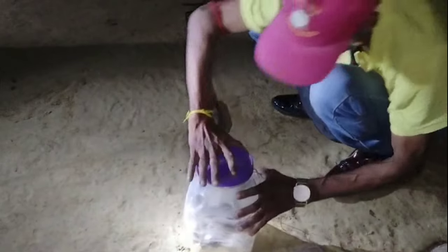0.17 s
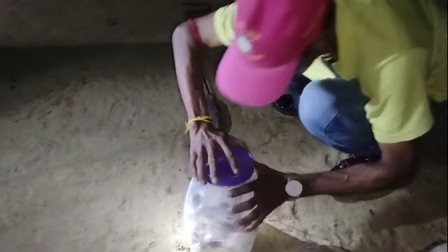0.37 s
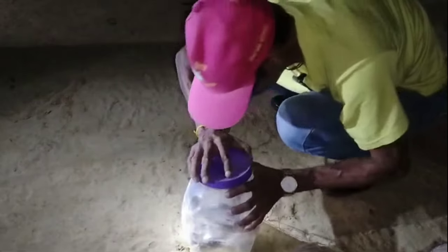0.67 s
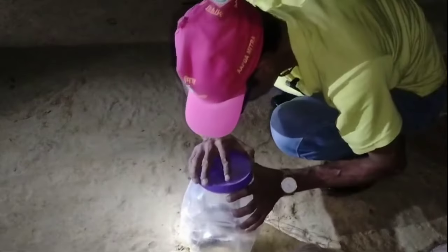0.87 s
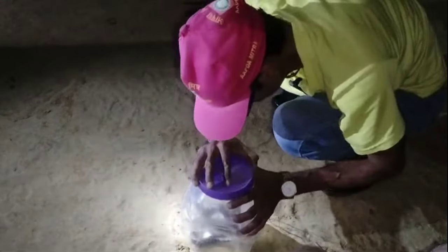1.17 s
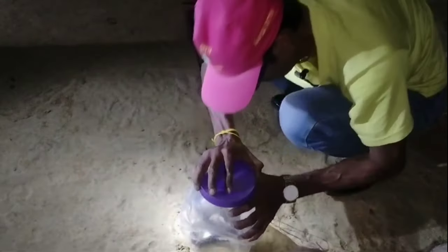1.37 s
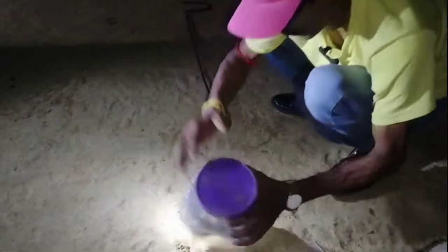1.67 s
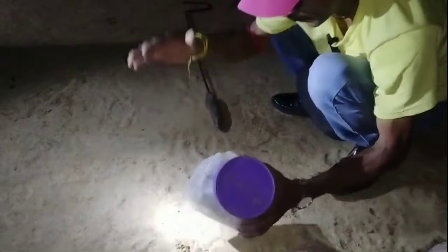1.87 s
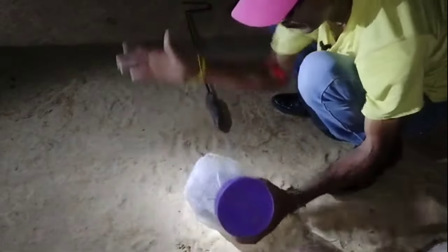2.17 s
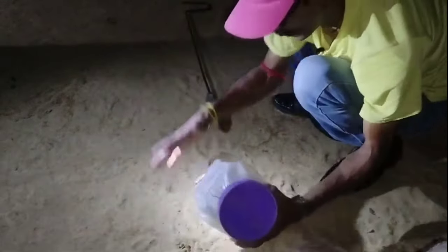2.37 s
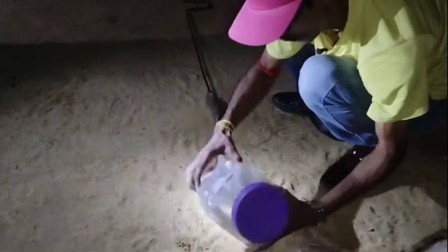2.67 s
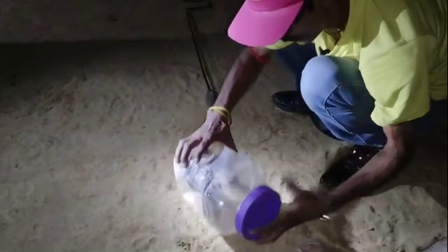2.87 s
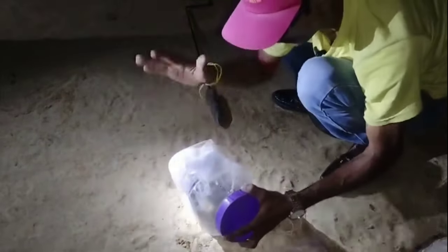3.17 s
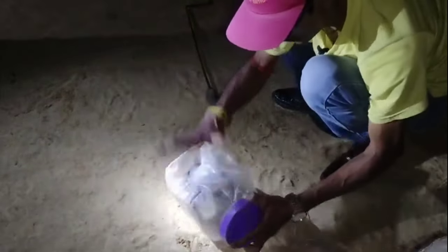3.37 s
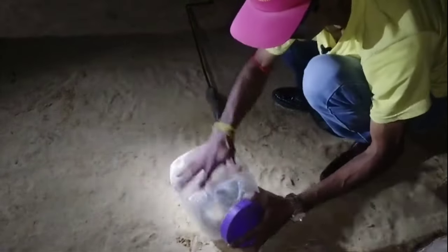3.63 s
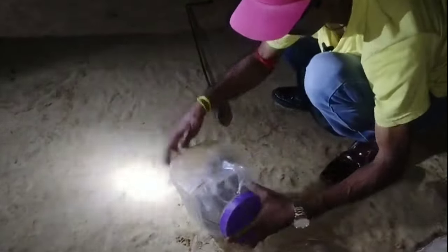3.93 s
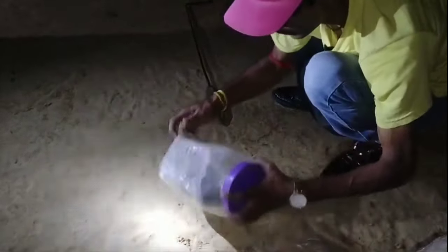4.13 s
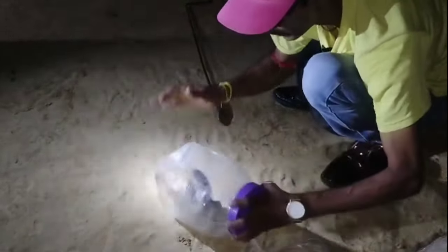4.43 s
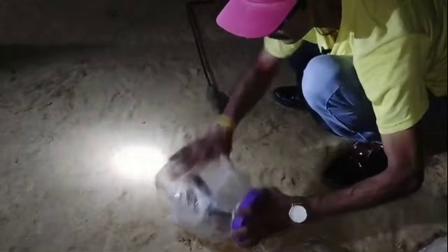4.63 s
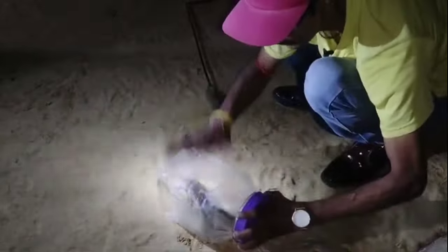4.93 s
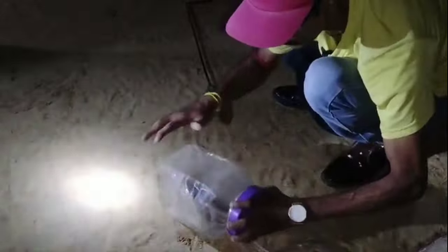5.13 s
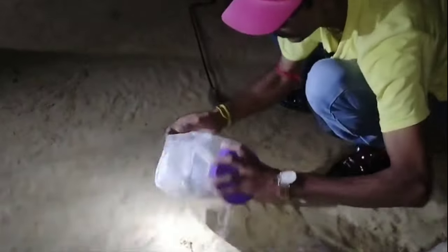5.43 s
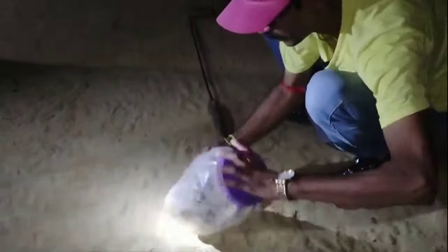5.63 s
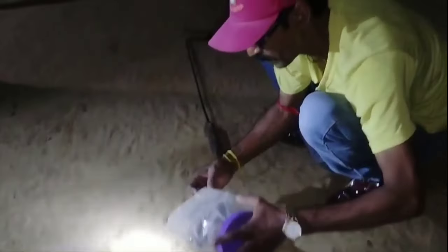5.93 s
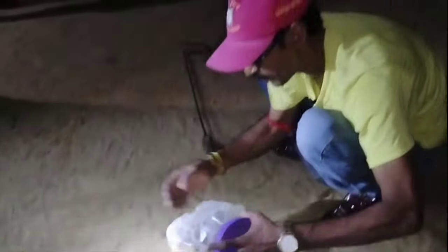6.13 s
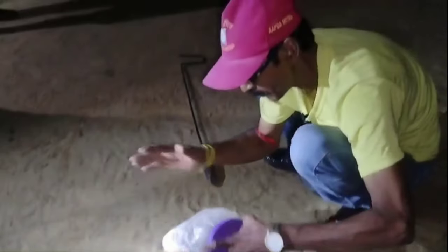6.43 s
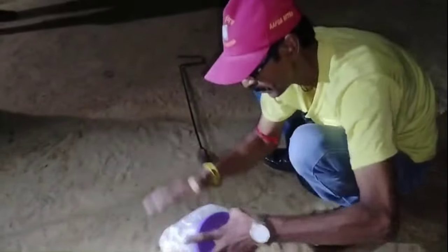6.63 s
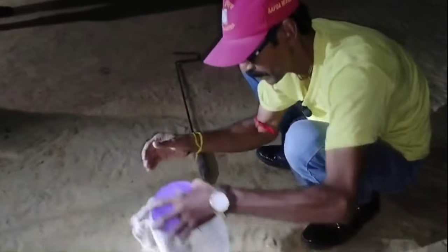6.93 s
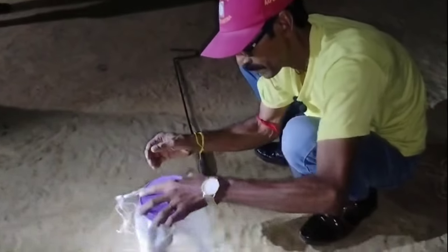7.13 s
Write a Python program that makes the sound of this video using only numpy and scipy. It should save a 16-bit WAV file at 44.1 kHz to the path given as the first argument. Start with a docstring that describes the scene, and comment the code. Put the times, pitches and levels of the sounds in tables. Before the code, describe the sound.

A large thin-walled plastic jar is turned, knocked and rolled on bare earth, with hollow pops, bright crackles and short rubs, heard almost only on the right.

```python
"""Outdoors at night, a hand turns, knocks and rolls a big thin-walled plastic jar on an earth floor.
Knocks ring a hollow, a wall panel and a bright crack; bumps on the ground add a boom of the air inside.
Rubbing, scuffs and touches are grains and small rings through resonances; faint far cries are gliding tones.
The close microphone ducks and clips the loud knocks, thins faint sound and feeds almost only the right channel."""
import sys
import numpy as np
from scipy import signal
from scipy.fft import rfft, irfft
from scipy.io import wavfile
from scipy.ndimage import uniform_filter1d

SR = 44100
rng = np.random.default_rng(int(sys.argv[2]) if len(sys.argv) > 2 else 0)


def wav_record(signal):
    """Record a signal, one row per channel, as 16-bit PCM in the file named by sys.argv[1]."""
    frames = np.transpose(np.atleast_2d(signal))
    bounded = np.clip(frames, -1, 1)
    # unit amplitude maps onto the largest positive 16-bit level
    quanta = np.round(bounded * 32767).astype(np.int16)
    wavfile.write(sys.argv[1], SR, quanta)


N = 321869
AGE_S = np.arange(-SR // 40, SR // 6) / SR   # time since a knock; fingers press a moment before the wall gives
WALL_HZ = 828   # usual pitch of a wall panel

# strokes of hand and soil over the jar: start_s, length_s, hollow_db, hiss_db
RUB_STROKES = [(0, .05, -31, -60), (0.149, 0.29, -40.5, -66.5), (0.739, 0.085, -31.5, -50.5),
               (.87, 0.057, -39.5, -65), (0.988, 0.11, -38.5, -60.5), (1.346, 0.092, -51, -73),
               (1.482, .19, -47, -66.5), (1.728, 0.1, -43, -52.5), (1.947, .11, -51.5, -52),
               (2.217, 0.081, -57, -85), (2.817, 0.17, -47.5, -60.5), (3.008, 0.09, -49, -52),
               (3.183, 0.17, -52, -66), (3.933, .24, -53.5, -64), (4.224, 0.087, -40, -62),
               (4.81, 0.083, -46.5, -60.5), (4.955, 0.11, -50.5, -65), (5.251, .08, -44.5, -67.5),
               (5.554, 0.078, -42, -63.5), (5.729, 0.065, -58.5, -67), (5.93, 0.082, -35.5, -62.5),
               (6.292, .07, -49, -68), (6.468, 0.11, -57, -73), (6.867, 0.067, -42, -57),
               (6.975, 0.052, -51, -67.5)]


def from_db(db):
    """Decibels to gain."""
    return 10 ** (np.asarray(db) / 20)


def rms_one(x):
    """Scale to rms 1."""
    return x / np.sqrt(np.mean(x ** 2) + 1e-20)


def at_level(x, db):
    """Scale a short sound to the energy of 10 ms at this rms level."""
    return x * from_db(db) * np.sqrt(SR / 100 / (np.sum(x ** 2) + 1e-20))


def add(out, start_s, sound):
    """Mix a short sound in, trimmed to the scene."""
    start = int(start_s * SR)
    sound = sound[max(-start, 0):max(N - start, 0)]
    first = max(start, 0)
    out[first:first + len(sound)] += sound


def dying(t60_s, hold_s=0):
    """Envelope that starts with the knock, holds, then falls 60 dB in t60_s."""
    return (AGE_S >= 0) * from_db(-60 * np.maximum(AGE_S - hold_s, 0) / t60_s)


def drift(points_per_s):
    """Slow random curve through normal points of spread 1."""
    points = rng.standard_normal(N // 20)
    return np.interp(np.arange(N) / SR * points_per_s, np.arange(len(points)), points)


def coloured(x, spectrum):
    """Causal (minimum-phase) filter with the given spectrum, built by folding its cepstrum."""
    size = 1024
    hz, db = np.transpose(spectrum)
    bin_hz = np.arange(size // 2 + 1) * SR / size
    log_gain = np.log(from_db(np.interp(np.log(bin_hz + 1), np.log(hz), db)))
    cepstrum = irfft(log_gain) * (1 + np.sign(np.fft.fftfreq(size)))
    impulse = irfft(np.exp(rfft(cepstrum)))
    return signal.fftconvolve(x, impulse)[:len(x)]


def band(x, low_hz, high_hz):
    """Gentle band-pass."""
    return signal.sosfilt(signal.butter(2, [low_hz, high_hz], "band", fs=SR, output="sos"), x)


def soft(x, top_hz):
    """A soft contact passes little treble: steep low-pass."""
    return signal.sosfilt(signal.butter(6, top_hz, fs=SR, output="sos"), x + 1e-18)


def ring(force, hz, t60_s):
    """One damped mode driven by a force."""
    r, w = from_db(-60 / (t60_s * SR)), 2 * np.pi * hz / SR
    return signal.lfilter([np.sin(w), -np.sin(w)], [1, -2 * r * np.cos(w), r * r], force) / w


def slips(count, per_s, spread_db):
    """Tiny slips: sparse clicks of random sign and uneven size."""
    present = rng.random(count) < per_s / SR
    size = from_db(spread_db * rng.standard_normal(count))
    return present * rng.choice([-1, 1], count) * size


def night():
    """Very quiet noise floor: coloured noise with a trace of hum."""
    # rumble and hiss of the microphone: pitch_hz, relative_db_per_hz
    air_spectrum = [(25, -15), (100, -9), (200, -7), (500, -15), (1500, -15.5), (5000, -19.5), (15000, -25)]
    air_db, hum_hz, hum_db = -65.5, 95, -73.5
    air = from_db(air_db) * rms_one(coloured(rng.standard_normal(N), air_spectrum))
    hum = from_db(hum_db) * np.sin(2 * np.pi * hum_hz * np.arange(N) / SR)
    return air + hum


def far_cries(waver, overtone_db, flicker_db):
    """Thin gliding tones with a weak octave, made unsteady in pitch and level by the distance."""
    # one glide per cry: start_s, length_s, first_hz, last_hz, level_db (before flicker)
    cries = [(0.167, 0.14, 1246, 1348, -45.5), (0.495, 0.074, 1810, 1710, -46),
             (0.527, 0.077, 890, 1008, -44.5), (6.07, 0.11, 606, 860, -51.5),
             (6.277, .09, 1660, 1740, -56.5), (6.512, 0.1, 957, 858, -46.5), (6.68, 0.045, 564, 540, -43.5),
             (7.106, 0.21, 712, 1065, -54)]
    fade_share = 0.26   # share of a cry spent swelling and fading
    out = np.zeros(N)
    for start_s, length_s, first_hz, last_hz, db in cries:
        count = int(length_s * SR)
        unsteady = 1 + waver * rms_one(band(rng.standard_normal(N), 36, 48))[-count:]
        phase = 2 * np.pi * np.cumsum(np.geomspace(first_hz, last_hz, count) * unsteady) / SR
        tone = np.sin(phase) + from_db(overtone_db) * np.sin(2 * phase)
        add(out, start_s, from_db(db) * signal.windows.tukey(count, fade_share) * tone)
    return out * from_db(flicker_db * drift(points_per_s=60))


def touch(low_hz, high_hz, db, t60_s):
    """One small, short ring, anywhere in a range of pitch."""
    spread_db = 5.5
    pitch, size = rng.random(2)
    tone = np.sin(2 * np.pi * low_hz * (high_hz / low_hz) ** pitch * AGE_S)
    swell = 1 - dying(.02)
    return at_level(tone * dying(t60_s) * swell, db + spread_db * (2 * size - 1))


def fidgets():
    """The holding fingers shift at random; in a stroke, dense random short rings add a higher grain."""
    fidgets_per_s, grains_per_s = 5, 170
    grain_db = 4   # relative to the hiss of its stroke
    out = np.zeros(N)
    for start_s in rng.uniform(0, N / SR, int(fidgets_per_s * N / SR)):
        add(out, start_s, touch(192, 1000, db=-54.5, t60_s=.05))
    for stroke_s, length_s, _, hiss_db in RUB_STROKES:
        for start_s in stroke_s + length_s * rng.random(int(grains_per_s * length_s)):
            add(out, start_s + AGE_S[0], touch(1100, 4560, hiss_db + grain_db, t60_s=.028))
    return out


def rubbed(spectrum, count, per_s, width, patchy_db):
    """Stick-slip grains ring a row of resonances; each one's level wanders at random: a patchy rub."""
    hz, db = np.transpose(spectrum)
    grains = slips(N, per_s, spread_db=4) * from_db(3 * drift(70))
    out = np.zeros(N)
    for centre_hz in np.geomspace(hz[0], hz[-1], count):
        gain = from_db(np.interp(centre_hz, hz, db) + patchy_db * drift(31))
        out += gain * rms_one(band(grains, centre_hz / (1 + width), centre_hz * (1 + width)))
    return rms_one(out)


def rubbing():
    """Hands and soil slide on the jar, exciting its hollow and hissing on its skin, over a faint grip."""
    # hollow part of the rub: pitch_hz, relative_db
    hollow_spectrum = [(150, -17), (250, -7), (420, 0), (800, -2), (1400, -13), (1800, -14)]
    # hiss on the skin of the jar: pitch_hz, relative_db
    hiss_spectrum = [(1800, 2), (2600, -12.5), (4400, 2.5), (5600, 1), (8000, -8), (11000, -22.5)]
    attack_s, release_s = .02, 0.09
    t_s = np.arange(N) / SR
    # faint steady rubbing of the hand that holds the jar
    hollow_gain, hiss_gain = np.full(N, from_db(-70)), np.full(N, from_db(-78.5))
    for start_s, length_s, hollow_db, hiss_db in RUB_STROKES:
        rise = (t_s - start_s) / attack_s
        fall = (start_s + length_s - t_s) / release_s
        stroke = np.clip(np.minimum(rise, fall) + .5, 0, 1)   # half height at start and end
        hollow_gain += from_db(hollow_db) * stroke
        hiss_gain += from_db(hiss_db) * stroke
    hollow = rubbed(hollow_spectrum, count=9, per_s=300, width=0.064, patchy_db=9)
    hiss = rubbed(hiss_spectrum, count=11, per_s=3700, width=0.15, patchy_db=2.5)
    return hollow * hollow_gain + hiss * hiss_gain


def scuffs():
    """A fingertip skids: a short swell of fine grains around one pitch."""
    # skids: start_s, length_s, pitch_hz, level_db
    skids = [(0, 0.067, 780, -36), (0, 0.065, 4400, -53), (0.077, 0.051, 3870, -46.5),
             (0.13, 0.062, 8080, -45.5), (0.296, 0.035, 8000, -58.5), (0.156, 0.096, 860, -38.5),
             (0.293, 0.16, 3400, -54.5), (0.555, 0.056, 4040, -52), (0.746, .032, 1960, -27),
             (.749, 0.041, 6500, -48), (0.865, 0.032, 4250, -44.5), (.868, 0.033, 1390, -28),
             (.981, .037, 3870, -44), (1.031, .04, 1530, -40), (1.707, 0.0063, 3230, -40),
             (1.733, 0.038, 4460, -42.5), (2.028, 0.022, 3828, -43.5), (3.264, 0.008, 1920, -32.5),
             (3.308, 0.032, 2300, -41), (3.905, 0.047, 7600, -52.5), (4.098, 0.011, 2460, -42),
             (4.213, .013, 1834, -22.5), (4.241, 0.069, 3070, -52.5), (4.267, .008, 8150, -54.5),
             (4.324, 0.033, 1100, -41.5), (4.329, .03, 7760, -54.5), (4.437, 0.039, 3260, -45),
             (4.598, 0.064, 2120, -47.5), (5.546, 0.11, 2980, -55), (5.56, 0.055, 920, -48.5),
             (5.727, .063, 2820, -57.5), (5.92, 0.0089, 2340, -25), (5.937, 0.086, 2710, -47),
             (6.296, 0.085, 600, -54), (6.327, 0.034, 3520, -60)]
    out = np.zeros(N)
    for start_s, length_s, hz, db in skids:
        count = int(length_s * SR)
        grains = slips(count, per_s=5000, spread_db=4)
        skid = rms_one(band(grains, hz * 0.85, hz * 1.095))
        add(out, start_s, from_db(db) * skid * signal.windows.tukey(count, .7))
    return out


def crumple(length_s, per_s, settle_t60_s, snap_db, lead_db, lead_s):
    """Force of a buckling wall: slips build up, it snaps, and a run of small folds dies away."""
    build_up = (AGE_S < 0) * from_db(lead_db) * np.exp(-np.abs(AGE_S) / lead_s)
    envelope = build_up + dying(settle_t60_s, length_s)
    folds = at_level(slips(len(AGE_S), per_s, spread_db=3) * envelope, 0)
    # a long crumple snaps less
    snap = from_db(snap_db) * np.sqrt(np.sum(folds ** 2)) / (1 + length_s / 0.0035)
    return folds + (AGE_S == 0) * snap


def panel(force, hz, modes, tail_db, tail_t60_s, top):
    """A panel rings in its modes, each with a strength of its own; the sound lingers inside the jar."""
    direct = np.zeros(len(AGE_S))
    for k, (ratio, db, t60_s) in enumerate(modes):
        mode_db = db + 2 * rng.standard_normal()
        direct += (-1) ** k * at_level(ring(force, hz * ratio, t60_s), mode_db)
    tail = rng.standard_normal(len(AGE_S)) * dying(tail_t60_s) * (1 - dying(0.22))
    inside = band(tail, hz * 0.5, hz * 1.563)
    return soft(at_level(direct, 0) + at_level(inside, tail_db), hz * top)


def crack(length_s, hz, focus_db, tail_db, tail_t60_s):
    """The crease itself: a bright burst with one stiff resonance and a gritty tail."""
    # colour of a crack: pitch_hz, relative_db
    crack_spectrum = [(500, -33.5), (1300, -7), (2000, 1), (2800, 2.5), (3500, 1), (4600, -1),
                      (6000, -18.5), (8000, -17.5), (12000, -35.5), (15000, -33)]
    force = crumple(length_s, per_s=6200, settle_t60_s=0.015, snap_db=-7.5, lead_db=-23, lead_s=0.0038)
    grit = slips(len(AGE_S), per_s=4000, spread_db=4) * dying(tail_t60_s)
    burst = coloured(at_level(force, 0) + at_level(grit, tail_db), crack_spectrum)
    return at_level(burst, 0) + at_level(band(burst, hz * .87, hz * 1.15), focus_db)


def knock(length_s, hollow_hz, hollow_db, wall_hz, wall_db, crack_hz, crack_db, thump_db):
    """Every knock sounds the hollow body, a wall panel and a crack, over a thump of the whole jar."""
    # modes of the hollow body: pitch_ratio, relative_db, t60_s
    hollow_modes = [(0.681, -4.5, 0.06), (1.001, 8.5, 0.025), (1.3, -6.5, .045), (1.619, -9.5, 0.035)]
    # modes of a wall panel: pitch_ratio, relative_db, t60_s
    wall_modes = [(0.804, 3, 0.011), (0.998, 15, 0.01), (1.29, -8, 0.021), (1.652, -13.5, 0.043),
                  (2.051, -6, 0.0092)]
    # a crack weaker than full loses treble, a stronger one gains it
    full_crack_db, treble_db_per_db = -17, 0.37
    force = crumple(length_s, per_s=3000, settle_t60_s=0.017, snap_db=6.0, lead_db=-12.0, lead_s=.003)
    hollow = panel(force, hollow_hz, hollow_modes, tail_db=-15, tail_t60_s=0.073, top=2.1)
    wall = panel(force, wall_hz, wall_modes, tail_db=-14.5, tail_t60_s=0.05, top=2.07)
    treble_db = np.clip(treble_db_per_db * (crack_db - full_crack_db), -10, 3)
    snap = crack(length_s, crack_hz, focus_db=-3.5, tail_db=-13.5, tail_t60_s=0.08)
    snap = coloured(snap, [(4800, 0), (6500, treble_db)])
    thump = soft(ring(force, 280, t60_s=0.0055), top_hz=300)
    body = at_level(hollow, hollow_db) + at_level(wall, wall_db)
    return body + at_level(snap, crack_db) + at_level(thump, thump_db)


def any_wall_hz():
    """Pitch of the panel that happens to be touched, scattered from spot to spot."""
    return WALL_HZ * np.exp(0.062 * rng.standard_normal())


def knocks():
    """Buckles, bumps, dull knocks and ticks share one jar; the kind of contact sets the balance of parts."""
    # walls buckling under the hand:
    # start_s, crumple_length_s, hollow_hz, hollow_db, wall_hz, wall_db, crack_db
    buckles = [(0.938, 0.0027, 483, -6, 1000, -1, -11), (1.0721, 0.0014, 448, -6, 875, -11.5, -23.5),
               (1.2513, 0.0011, 657, -16.5, 1477, -2, -3.5), (1.3201, 0.00099, 678, -29, 1286, -22, -24.5),
               (1.338, 0.0049, 615, -8.5, 893.5, -13.5, -30),
               (1.483, 0.00039, 503.3, -23, 1050, -21, -26.5), (1.4896, 0.0027, 462, -5, 949, -8, -19),
               (1.81, 0.0017, 573.5, -6.5, 850, -12, -9), (1.881, 0.0052, 573, -21, 685, -13, -30),
               (1.9, 0.002, 474, -20, 1026, -13, -22), (2.0102, .003, 513.9, -25.5, 926, -18, -20),
               (2.1403, 0.0017, 579, -9.5, 708, -17.5, -21.5), (2.5527, 0.0049, 419, -12.5, 761, -5, -8),
               (2.59, 0.0057, 410, -5.5, 893, -10, -15), (2.6042, 0.0048, 364, -4, 732, -6.5, -8),
               (2.8986, 0.00088, 460, -12, 944, -23, -25), (2.944, 0.0015, 408, -11.5, 767, -11.5, -13),
               (2.949, 0.0024, 394, -24, 1620, -18.5, -10), (3.2678, 0.006, 447, -15, 970, -13.5, -34.5),
               (3.5794, 0.02, 492, 9, 839, 6, 4.5), (3.6075, 0.017, 278, -11.5, 853, -19, -15.5),
               (3.6685, 0.00076, 516, -3.5, 847, -7, -17.5), (3.8872, 0.013, 504, -3.5, 850, -10.5, -21.5),
               (3.8984, 0.00052, 474, -9, 740, -12, -20), (4.0311, 0.0061, 419, -5.5, 914, -21.5, -28),
               (4.1299, 0.0016, 542, -18.5, 810, -26.5, -22), (4.1425, 0.00048, 568, -13.5, 760, -34, -23),
               (4.3589, 0.0048, 560, -11, 822, -12.5, -26.5), (4.9298, 0.0029, 478.4, -2.5, 784, -6, -28.5),
               (4.9394, 0.013, 414, 0.5, 740, 0, -1.5), (5.056, 0.0057, 445, -1.5, 893, -13, -19.5),
               (5.2611, 0.015, 395.6, 6.5, 972, -8, -11), (5.299, 0.0014, 405, 0, 1176, -15.5, -8.5),
               (6.8294, .017, 371.4, 6, 986, -10.5, -4.5), (6.8589, 0.0087, 359, -1, 810, -4, -16.5)]
    # bumps on the ground: start_s, hollow_hz, hollow_db, wall_db, crack_db, boom_hz, boom_db
    bumps = [(0.1215, 533, -10.5, -6, -20.5, 89.8, -22.5), (2.5495, 289, -10, -13, -21.5, 160, -20),
             (2.7851, 395, -3.5, -8.5, -19.5, 100, -15), (3.2068, 365, -19, -19, -20, 151.4, -26),
             (4.493, 401, -13, -39.5, -58, 178.5, -28.5), (4.5944, 369.5, -9, -20.5, -33.5, 170, -13),
             (5.581, 270, -31.5, -50.5, -61, 157.4, -43.5), (5.9239, 442, -7, -19, -47, 170, -18),
             (5.9537, 334, -16, -45, -51, 182, -23)]
    # dull knocks, from faint pats to hard thuds: start_s, hollow_hz, hollow_db, wall_db
    dull_knocks = [(.2138, 526, -41, -33), (0.3746, 380, -38, -39), (.4198, 412.6, -29, -51),
                   (.712, 415, -23.5, -28.5), (.7526, 495, -15.5, -25), (.7848, 397, -12.5, -15.5),
                   (.874, 460, -20, -27.5), (.8924, 440, -25, -35), (.9302, 476, -16, -40),
                   (.9918, 392, -17, -32), (1.0024, 358, -23.5, -42.5), (1.213, 480, -33.5, -60),
                   (1.4678, 397, -26.5, -22.5), (1.5233, 465, -30, -37), (1.5441, 344, -24, -29),
                   (1.5976, 445, -21, -27), (1.6554, 302, -31, -64), (1.7486, 485, -12.5, -41),
                   (1.7654, 300, -26.5, -49), (2.0368, 330, -36.5, -29), (2.33, 393, -46, -48),
                   (2.423, 378, -50, -63), (2.6784, 323.7, -29.5, -46.5), (2.838, 476.7, -23, -58),
                   (2.874, 500, -21.5, -24.5), (3.0277, 286, -27, -28.5), (3.0904, 385, -20, -24.5),
                   (3.1218, 417.7, -24, -32), (3.294, 507, -22, -24.5), (3.3185, 520, -28, -32.5),
                   (3.5741, 369, 9, -4), (3.63, 546, -11, -27.5), (3.6798, 531, -14, -26),
                   (3.7354, 327, -38.5, -68.5), (4.1661, 412, -17, -34.5), (4.2148, 443, -25, -17.5),
                   (4.2521, 395, -22, -47), (4.276, 360.5, -23, -50), (4.3021, 484, -19.5, -56),
                   (4.5102, 380, -26, -54), (4.726, 247, -50.5, -64), (5.0991, 590, -23, -17),
                   (5.1446, 435, -14.5, -40.5), (5.355, 369, -31, -47), (5.3923, 532.5, -16, -37.5),
                   (5.4246, 471, -27.5, -48.5), (6.0102, 415, -22.5, -37.5), (6.273, 278.6, -43.5, -62.5),
                   (6.438, 332, -31.5, -60.5), (6.481, 376, -43.5, -52.5), (6.878, 470, -2, -20),
                   (6.941, 357, -34, -61.5), (7.011, 328, -50, -73)]
    # small creases that hardly move the wall: start_s, crack_hz, crack_db
    ticks = [(.488, 3350, -45), (.588, 3750, -34.5), (0.594, 3660, -30), (0.9313, 3900, -37),
             (1.0024, 3940, -35.5), (1.0733, 4150, -8), (1.172, 3916, -40), (1.244, 2300, -25.5),
             (1.4681, 3400, -28), (1.524, 4480, -35.5), (1.5442, 3890, -31.5), (1.599, 4460, -32),
             (1.783, 4460, -13.5), (1.7928, 3510, -15.5), (2.8144, 2240, -22.5), (2.839, 2050, -24.5),
             (2.8603, 2870, -26), (2.9075, 5290, -15), (3.0304, 4400, -24), (3.0406, 2680, -40),
             (3.231, 2380, -25.5), (3.63, 1930, -23.5), (3.6485, 3250, -23.5), (3.94, 2740, -39),
             (3.985, 3660, -48.5), (4.1671, 2150, -47.5), (5.0147, 2350, -38), (6.9049, 4184, -27.5),
             (6.974, 3440, -50)]
    usual_crack_hz = 2392
    bump_s, dull_s, tick_s = .003, 0.008, 0.00059   # contact times
    # relative to the hollow ring
    buckle_thump_db, contact_thump_db, tick_thump_db, dull_crack_db = -27.5, -19, -2.5, -44
    tick_body_db = -24   # relative to the crack
    out = np.zeros(N)
    for start_s, length_s, hz, db, wall_hz, wall_db, crack_db in buckles:
        thump_db = db + buckle_thump_db
        sound = knock(length_s, hz, db, wall_hz, wall_db, usual_crack_hz, crack_db, thump_db)
        add(out, start_s + AGE_S[0], sound)
    for start_s, hz, db, wall_db, crack_db, boom_hz, boom_db in bumps:
        air_ring = ring(1.0 * (AGE_S == 0), boom_hz, t60_s=0.027)
        boom = at_level(soft(air_ring, top_hz=300), boom_db)
        thump_db = db + contact_thump_db
        sound = knock(bump_s, hz, db, any_wall_hz(), wall_db, usual_crack_hz, crack_db, thump_db)
        add(out, start_s + AGE_S[0], boom + sound)
    for start_s, hz, db, wall_db in dull_knocks:
        crack_db, thump_db = db + dull_crack_db, db + contact_thump_db
        sound = knock(dull_s, hz, db, any_wall_hz(), wall_db, usual_crack_hz, crack_db, thump_db)
        add(out, start_s + AGE_S[0], sound)
    for start_s, crack_hz, crack_db in ticks:
        body_db = crack_db + tick_body_db
        thump_db = body_db + tick_thump_db
        sound = knock(tick_s, WALL_HZ / 2, body_db, any_wall_hz(), body_db, crack_hz, crack_db, thump_db)
        add(out, start_s + AGE_S[0], sound)
    return signal.sosfilt(signal.butter(2, 100, "high", fs=SR, output="sos"), out)


def scene():
    """Everything reaches one microphone, feeding two equal channels."""
    background = night() + far_cries(waver=0.015, overtone_db=-25, flicker_db=4)
    sound = background + fidgets() + rubbing() + scuffs() + knocks()
    return np.array([sound, sound])


def limit(x, knee_db, share, attack_s, overshoot_fall_db_per_s):
    """Sluggish limiter: it misses the hit itself, ducks what follows and recovers."""
    over_db = np.maximum(20 * np.log10(np.abs(x).max(axis=0) + 1e-9) - knee_db, 0)
    fall_db = overshoot_fall_db_per_s * np.arange(N) / SR
    held_db = np.maximum.accumulate(over_db + fall_db) - fall_db
    r = np.exp(-1 / (attack_s * SR))
    smooth_db = signal.lfilter([(1 - r) ** 2], [1, -2 * r, r * r], held_db)
    return x * from_db(-share * smooth_db)


def suppress(x, threshold_db, depth_db):
    """Noise suppressor: each moment's faint bands are turned down, which cuts tails short."""
    hz, _, cells = signal.stft(x, SR, nperseg=512, noverlap=384)
    power = uniform_filter1d(np.abs(cells) ** 2, size=5, axis=-2)
    threshold = from_db(threshold_db) ** 2 / (1 + hz[:, None] / 600)   # lower in the treble
    gain = np.maximum(power ** 2 / (power ** 2 + threshold ** 2), from_db(depth_db))
    return signal.istft(cells * gain, SR, nperseg=512, noverlap=384)[1][:, :N]


def record(dry):
    """Limiter, noise suppression, hard overload, a nearly silent left channel, and the top cut off."""
    left_db, right_db, self_noise_db, cutoff_hz = -32.5, 0, -96.5, 15600
    ducked = limit(dry, knee_db=-3, share=0.63, attack_s=0.0082, overshoot_fall_db_per_s=156.5)
    heard = suppress(ducked, threshold_db=-62.0, depth_db=-7.5)
    panned = np.clip(heard, -1, 1) * from_db([[left_db], [right_db]])
    self_noise = from_db(self_noise_db) * rng.standard_normal((2, N))
    top_cut = signal.ellip(10, .1, 80, cutoff_hz, fs=SR, output="sos")
    return signal.sosfilt(top_cut, panned + self_noise)


dry = scene()
out = record(dry)
wav_record(out)
```